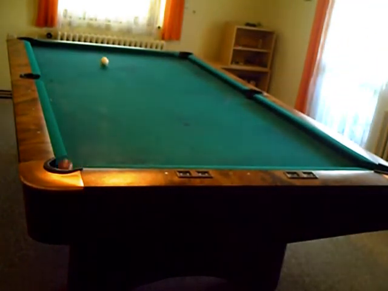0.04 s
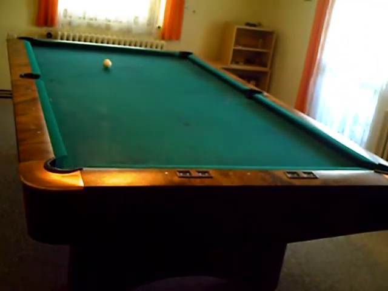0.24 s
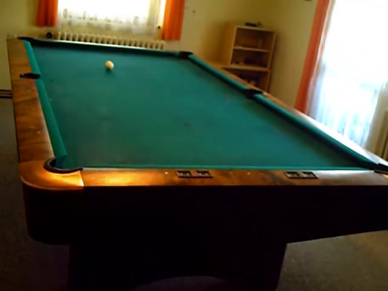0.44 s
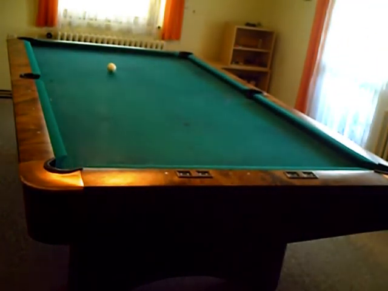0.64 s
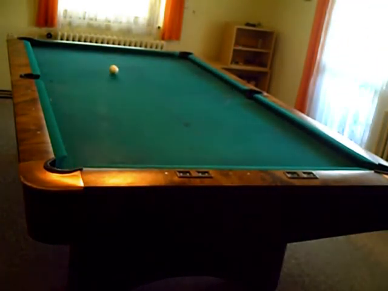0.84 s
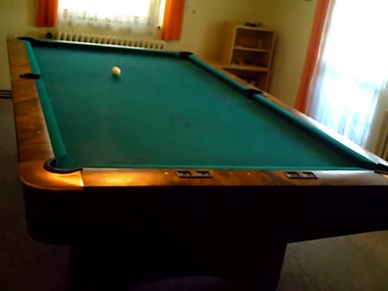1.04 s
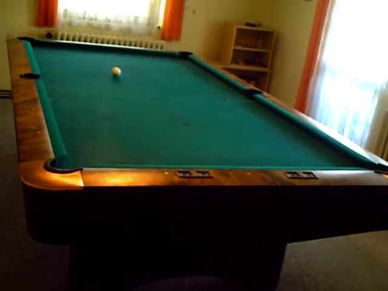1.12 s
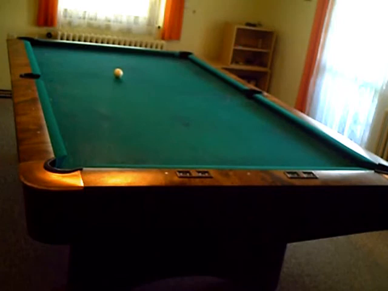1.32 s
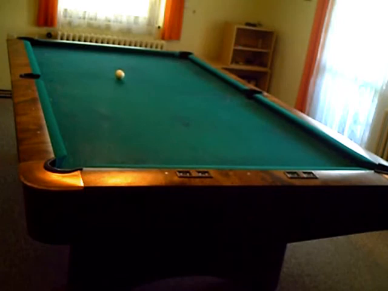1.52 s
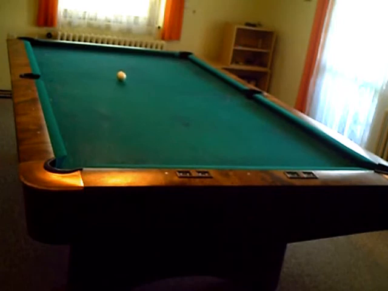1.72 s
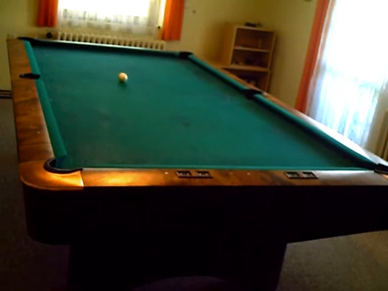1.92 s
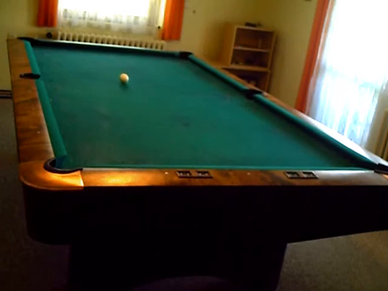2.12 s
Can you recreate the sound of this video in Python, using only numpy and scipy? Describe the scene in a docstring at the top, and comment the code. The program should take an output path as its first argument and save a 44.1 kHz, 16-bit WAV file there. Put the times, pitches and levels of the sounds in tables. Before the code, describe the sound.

A pool ball knocks sharply into a corner pocket at about 0.25 seconds, with a low thud from the table. It drops and bounces brightly on a hard chute, then from 0.5 seconds jolts and rumbles along the wooden return, growing duller and fading by about 1 second. After that, a few soft microphone bumps sound over the faint hiss and hum of a small room until 2 seconds.

```python
"""A small quiet room: hiss, faint mains hum, the last ring of a pool shot and a soft microphone bump.
The ball knocks into a corner pocket; the pocket rings, the heavy frame thuds, the table sways on its legs.
It starts to roll, drops and bounces on the hard chute below, then jolts down the wooden ball return,
with a burst of bright recorder fizz on each blow; its rumble dulls and fades deeper in the table.
The room rings out, and a few more soft bumps at the microphone sound over the hiss and hum."""
import sys
import numpy as np
from scipy import signal
from scipy.fft import rfft, irfft
from scipy.io import wavfile

SR = 44100
rng = np.random.default_rng(int(sys.argv[2]) if len(sys.argv) > 2 else 0)


def log_audio(samples):
    """Write samples as a 16-bit WAV file to the path given in sys.argv[1]."""
    # one column per channel
    frames = np.atleast_2d(samples).T
    # limit to full scale, then quantise
    limited = np.clip(frames, -1, 1)
    pcm = np.round(limited * 32767).astype(np.int16)
    wavfile.write(sys.argv[1], SR, pcm)


N = 94815
T = np.arange(N) / SR


def from_db(db):
    """Decibels to gain."""
    return 10 ** (np.asarray(db) / 20)


def unit(x):
    """Scale to energy 1."""
    return x / np.sqrt(np.sum(x ** 2) + 1e-20)


def decay(t, t60_s):
    """A fade that falls 60 dB in t60_s."""
    return np.exp(-np.log(1000) * t / t60_s)


def at_hz(points, hz):
    """Read a table on a log-frequency axis."""
    f, value = np.transpose(points)
    return np.interp(np.log(np.maximum(hz, 1)), np.log(f), value)


def filtered(x, hz, kind="low", order=2):
    """Butterworth filter."""
    return signal.sosfilt(signal.butter(order, hz, kind, fs=SR, output="sos"), x + 1e-18)


def coloured(x, spectrum):
    """Shape a signal with a smooth EQ curve."""
    gain = from_db(at_hz(spectrum, np.fft.rfftfreq(2 * N, 1 / SR)))
    return irfft(rfft(x, 2 * N) * gain)[:N]


def click(start_s):
    """A unit impulse."""
    return 1.0 * (np.arange(N) == int(start_s * SR))


def body(force, modes):
    """Ring a set of resonances: their powers add, and the ring starts at the blow (minimum phase)."""
    f = np.maximum(np.fft.rfftfreq(SR, 1 / SR), 1)
    power = sum(from_db(db) ** 2 / (1 + ((f - hz * hz / f) / width_hz) ** 2) for hz, width_hz, db in modes)
    cepstrum = irfft(np.log(power) / 2, SR)
    cepstrum[1:SR // 2] *= 2
    cepstrum[SR // 2 + 1:] = 0
    response = irfft(np.exp(rfft(cepstrum)), SR)
    return signal.fftconvolve(force, response)[:N]


# Tone of the hiss: frequency_hz, gain_db
HISS_EQ = [(20, 3), (35, 2), (80, -1.5), (200, -4.5), (500, -4.5), (1000, -7.5), (2000, -10.5), (4000, -14),
           (6500, -16), (8500, -15.5), (11000, -18)]
# Partials of the hum: harmonic_number, level_db
HUM_PARTIALS = [(1, -75.5), (2, -81), (3, -78.5), (4, -78.5), (5, -83), (6, -84.5), (7, -85.5)]


def room_tone(mains_hz=60.04):
    """A bed of hiss and mains hum, with the shot's last ring fading in the room."""
    hiss = from_db(-63.5) * unit(coloured(rng.standard_normal(N), HISS_EQ))
    shot_band = unit(filtered(rng.standard_normal(N), (940, 1850), "band"))
    shot_tail = from_db(-63) * shot_band * decay(T, t60_s=0.55)
    hum = sum(from_db(db) * np.sqrt(2) * np.sin(2 * np.pi * (harmonic * mains_hz * T + rng.random()))
              for harmonic, db in HUM_PARTIALS)
    return np.sqrt(N) * (hiss + shot_tail) + hum


# Soft bumps at the microphone: start_s, level_db, pitch_hz, ping_db
MIC_BUMPS = [(.214, -51, 89.5, -63), (1.097, -50.5, 69.4, -61.5), (1.221, -48.5, 250, -72),
             (1.488, -51.5, 100, -63), (1.588, -52.5, 100, -62.5), (1.821, -52, 95, -66),
             (1.964, -50.5, 274, -75)]


def microphone_bumps(ping_hz=3100):
    """Each bump is a short low swing with a faint high ping, then a dull tick."""
    out = 0
    for start_s, level_db, pitch_hz, ping_db in MIC_BUMPS:
        t = np.maximum(T - start_s, 0)
        swing = -np.sin(2 * np.pi * pitch_hz * t) * decay(t, t60_s=0.034)
        ping = np.sin(2 * np.pi * ping_hz * t) * decay(t, t60_s=0.037)
        tick = from_db(27.5) * filtered(click(start_s + 0.005), hz=500)
        out += from_db(level_db) * (swing + tick) + from_db(ping_db) * ping
    return out


# The ball hits the back of the pocket: start_s, level_db, cutoff_hz, fizz_db, thud_db
POCKET_KNOCKS = [(0.2407, -5.5, 2600, -18.5, -17), (0.2448, 0, 1487, -6.5, -8.5),
                 (0.2812, -6.5, 2190, -28, 1.5)]
# Ring of the pocket: pitch_hz, width_hz, level_db
POCKET_MODES = [(255, 27, 7.5), (335, 33, 9), (394, 19, 17.5), (447.5, 18, 26.5), (741, 86, 15.5),
                (1066, 23, 25), (1143, 94, 24.5), (1633, 165, 19), (2090, 120, 5.5)]


def pocket():
    """The ball knocks into the open pocket, the part heard most directly."""
    return knocks(POCKET_KNOCKS, POCKET_MODES, direct_db=-6.5)


def contact(hits):
    """Force of a run of blows; a softer contact makes a duller pulse."""
    force = np.zeros(N)
    impulse = click(0)[:SR // 100]
    for start_s, level_db, cutoff_hz, _, _ in hits:
        i = int(start_s * SR)
        force[i:i + len(impulse)] += from_db(level_db) * filtered(impulse, cutoff_hz, order=7)
    return force


# Tone of the recorder fizz: frequency_hz, gain_db
FIZZ_EQ = [(500, -11), (2000, 5.5), (4000, 0.5), (6500, -1.5), (8300, 1), (11000, -7)]


def knocks(hits, modes, direct_db):
    """The struck part rings, with a burst of bright recorder fizz on each blow."""
    # alternate blows scatter differently
    rings = sum(room(body(contact(hits[k::2]), modes), direct_db) for k in range(2))
    fizz = sum(from_db(fizz_db) * click(start_s) for start_s, _, _, fizz_db, _ in hits)
    return rings + room(coloured(fizz, FIZZ_EQ), direct_db=-12)


# Reverb time of the small room: frequency_hz, t60_s
ROOM_DECAY = [(60, 0.46), (200, 0.52), (550, 0.68), (1200, 0.43), (2500, 0.41), (5000, 0.42), (11000, 0.38)]


def room(x, direct_db, tail_rise_s=0.0082):
    """Direct sound, a quick scatter off the table and a tail that dies band by band."""
    t, hz = T[:SR], np.fft.rfftfreq(SR, 1 / SR)
    white = rfft(rng.standard_normal(SR))
    tail = 0
    for centre_hz, t60_s in ROOM_DECAY:
        band = at_hz([(f, f == centre_hz) for f, _ in ROOM_DECAY], hz)
        tail += irfft(white * band, SR) * decay(t, t60_s)
    tail *= 1 - np.exp(-t / tail_rise_s)
    scatter = rng.standard_normal(SR) * decay(t, t60_s=0.076)
    response = from_db(-4.5) * unit(tail) + from_db(-5) * unit(scatter)
    return from_db(direct_db) * x + signal.fftconvolve(x, response)[:N]


# Low ring of the table's frame: pitch_hz, width_hz, level_db
FRAME_MODES = [(31, 9.2, 10), (55.4, 8.8, -2), (105.8, 7.6, 16), (127.6, 8.8, 15.5), (165.5, 19, 14.5),
               (193.3, 27.5, 16.5)]


def frame_thud(roll_force):
    """Every blow and the rolling shake the heavy frame, adding weight underneath."""
    hits = POCKET_KNOCKS + CHUTE_BOUNCES + RETURN_JOLTS
    blows = sum(from_db(thud_db) * click(start_s) for start_s, _, _, _, thud_db in hits)
    low_force = filtered(blows + from_db(-6) * roll_force, hz=277)
    return room(body(low_force, FRAME_MODES), direct_db=-8)


def table_sway(pitch_hz=30.5):
    """The first knock sets the whole table swaying on its legs: a long sub-bass ring."""
    t = np.maximum(T - POCKET_KNOCKS[0][0], 0)
    return from_db(-50) * decay(t, t60_s=2.93) * np.sin(2 * np.pi * pitch_hz * t)


# Swell and fade of the rolling contact: time_s, level_db
ROLL_ENVELOPE = [(.27, -13), (.35, -10), (.45, -3.5), (.53, 1.5), (0.609, -4.5), (.67, -9.5), (.73, -17),
                 (.8, -21.5), (.9, -28), (1.05, -50)]


def rolling_force(bumps_per_s=310, trim_db=-15, spread_db=7):
    """Dense, uneven little bumps under the rolling ball."""
    time_s, level_db = np.transpose(ROLL_ENVELOPE)
    jitter, direction, strength = rng.random((SR // 10, 3)).T
    starts_s = (np.arange(len(jitter)) + jitter) / bumps_per_s
    bump_db = trim_db + np.interp(starts_s, time_s, level_db) + spread_db * (2 * strength - 1)
    sizes = np.sign(direction - 0.5) * from_db(bump_db)
    rolling = (starts_s > time_s[0]) & (starts_s < time_s[-1])
    return np.bincount((starts_s[rolling] * SR).astype(int), sizes[rolling], N)


# Ring of the wooden ball return: pitch_hz, width_hz, level_db
RETURN_MODES = [(315, 150, 7.5), (435, 77, 8.1), (461, 22, 6.2), (503, 26.5, 16), (557, 17.2, 19.3),
                (715, 80, 8.2), (923, 100, 6.3), (1000, 63, 12), (1137, 53, 18.4), (1162, 71, 13.2),
                (1237, 27, 13), (1455, 50, 5.3), (1603, 170, 9.7), (1786, 53, 5.9), (2180, 330, 9.6),
                (2615, 380, 7.1), (3090, 280, 2)]


def rumble(roll_force, open_hz=3020, muffle_from_s=0.62, octaves_per_s=2.7):
    """Rolling rings the wooden return, ever more muffled as the ball goes deeper into the table."""
    muffled = np.zeros(N + SR)
    step = SR // 25
    for i in range(0, int(ROLL_ENVELOPE[-1][0] * SR), step):
        cutoff_hz = open_hz * 2 ** (-octaves_per_s * max(T[i] - muffle_from_s, 0))
        block = np.pad(roll_force[i:i + step], (0, step))
        muffled[i:i + 2 * step] += filtered(block, cutoff_hz, order=4)
    return room(body(muffled[:N], RETURN_MODES), direct_db=-11.5)


# The ball lands on the chute: start_s, level_db, cutoff_hz, fizz_db, thud_db
CHUTE_BOUNCES = [(0.3443, -0.5, 3900, -18, -9), (0.3493, -4, 3460, -20.5, -26), (.3675, -6, 3520, -13, -7),
                 (.385, -15, 3250, -21, -6), (0.4139, -8.5, 3330, -17.5, -4.5),
                 (0.4177, -4.5, 3200, -8, -10), (.437, -12, 3500, -36, -5.5)]
# Ring of the chute: pitch_hz, width_hz, level_db
CHUTE_MODES = [(319, 50, 11), (416, 23, 16), (456, 27, 17.5), (750, 88, 3), (1090, 105, 20),
               (1626, 233, 21.5), (1730, 110, 12), (2480, 530, 9), (3200, 240, 4.6), (3900, 250, -10)]


def chute():
    """The ball drops and bounces on the hard chute: a bright, roomy clatter."""
    return knocks(CHUTE_BOUNCES, CHUTE_MODES, direct_db=-16.5)


# The ball jolts along the return: start_s, level_db, cutoff_hz, fizz_db, thud_db
RETURN_JOLTS = [(.474, -3.5, 3450, -16, 0.5), (.489, -1.5, 3040, -7.5, -2.5),
                (.517, -1.5, 3170, -11.5, -0.5), (.543, -6, 3150, -13, -9), (.563, -2.5, 3260, -17.5, -6.5),
                (.596, -5, 2860, -30, -1), (.614, -1.5, 2030, -22.5, 3), (.652, -11, 1950, -51, -20),
                (0.668, -14.5, 1800, -51, -7), (.747, -13.5, 1660, -48, -13)]


def ball_return():
    """The ball knocks against the wooden return, the last jolts softer and duller."""
    return knocks(RETURN_JOLTS, RETURN_MODES, direct_db=-11.5)


def scene():
    """Pocket, chute and return over the quiet room, in mono."""
    roll_force = rolling_force()
    ball = pocket() + chute() + ball_return() + rumble(roll_force)
    low_end = frame_thud(roll_force) + table_sway()
    return (ball + low_end + microphone_bumps() + room_tone())[None]


def record(dry, cutoff_hz=11130):
    """A steep low-pass takes off the top."""
    return signal.sosfilt(signal.ellip(12, 0.1, 70, cutoff_hz, fs=SR, output="sos"), dry)


dry = scene()
out = record(dry)
log_audio(out)
```